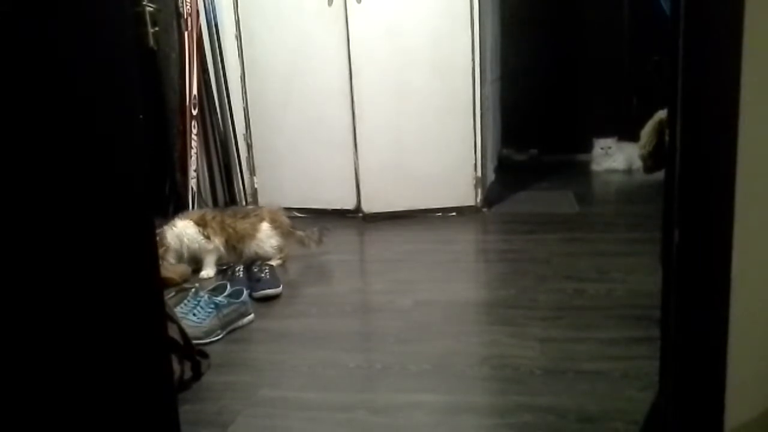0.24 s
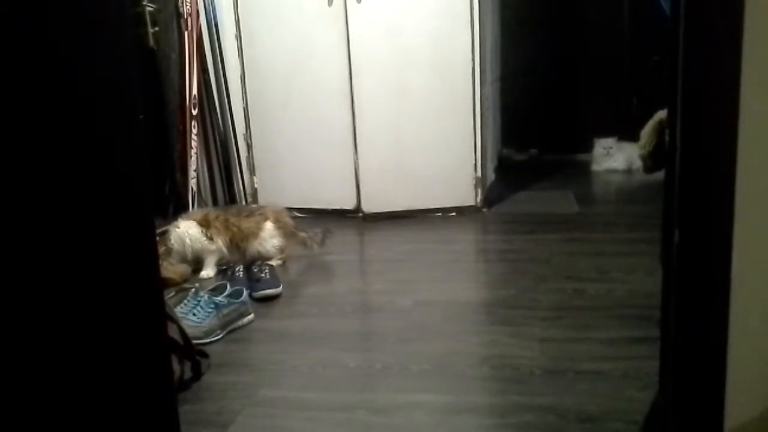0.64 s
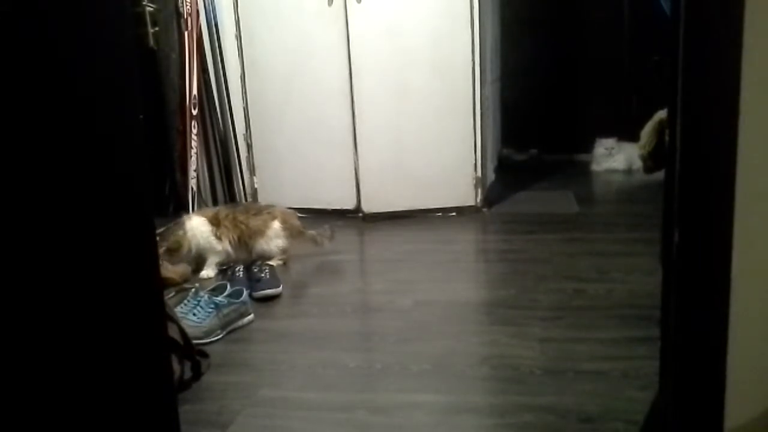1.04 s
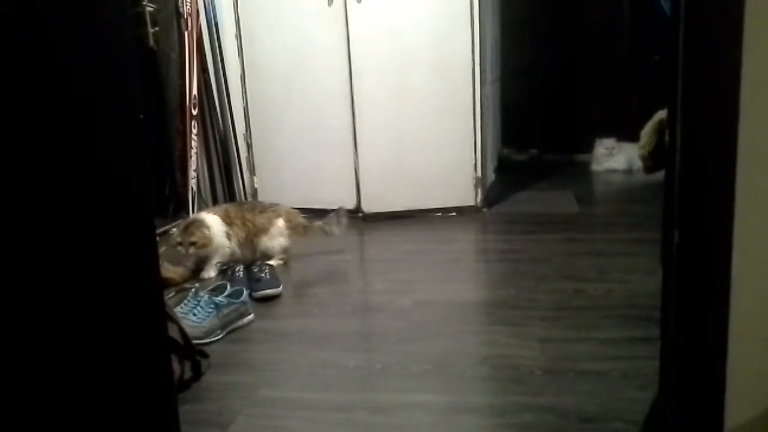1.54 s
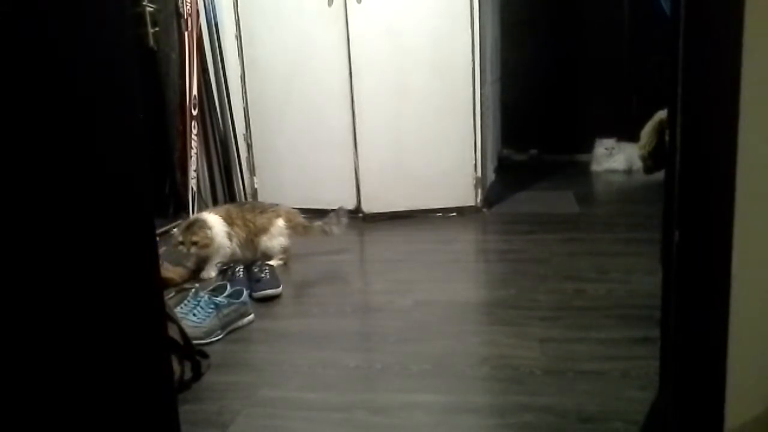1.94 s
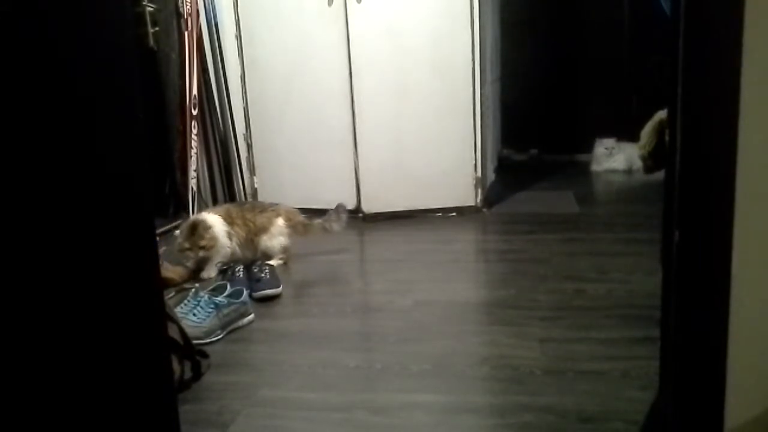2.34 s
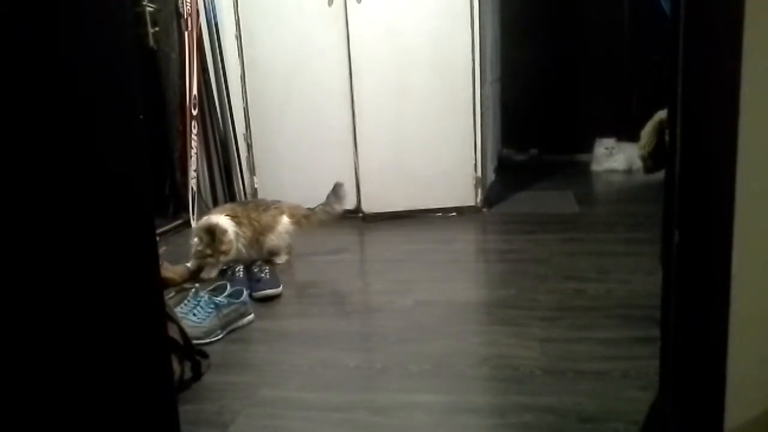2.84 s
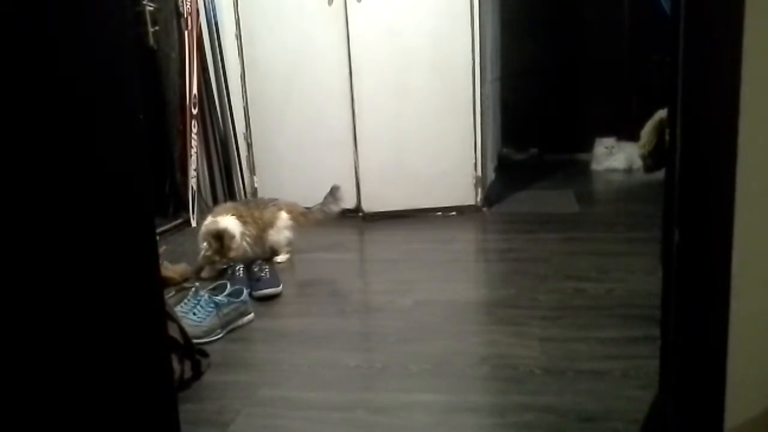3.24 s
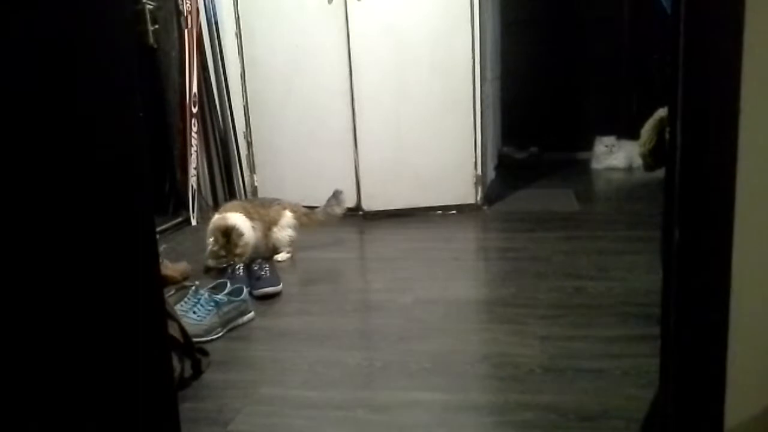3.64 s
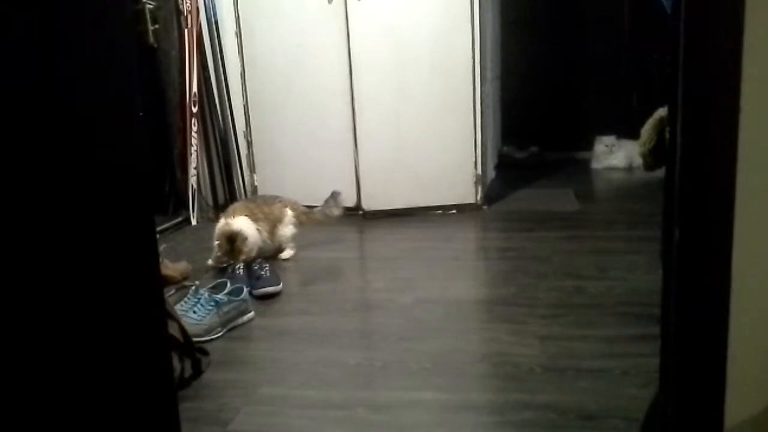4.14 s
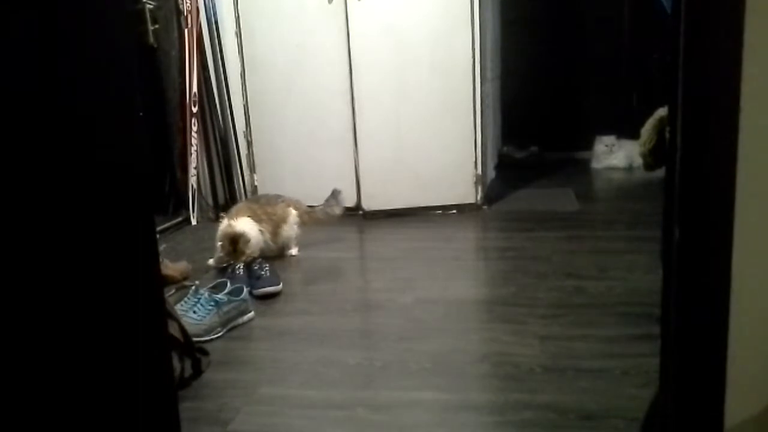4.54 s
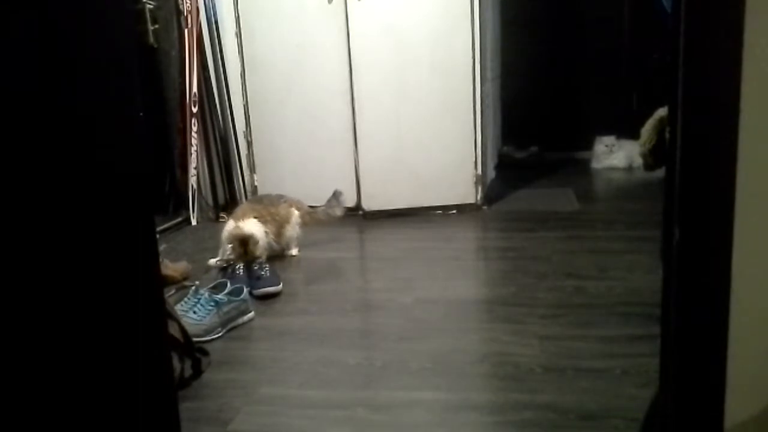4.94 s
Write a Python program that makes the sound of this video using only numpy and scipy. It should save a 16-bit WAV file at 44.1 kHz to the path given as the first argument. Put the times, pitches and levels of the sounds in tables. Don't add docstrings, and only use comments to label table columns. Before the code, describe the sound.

A hand-held coil tattoo machine clicks on and buzzes raspily without pause in a hallway, while something knocks over on the floor.

```python
import sys
import numpy as np
from scipy import signal
from scipy.fft import rfft, irfft
from scipy.io import wavfile
from scipy.ndimage import uniform_filter1d

SR = 44100
rng = np.random.default_rng(int(sys.argv[2]) if len(sys.argv) > 2 else 0)


def makeup_ratio(level_db):
    decades = np.asarray(level_db, float) / 20
    return 10 ** decades


def dump(signal):
    limited = np.clip(np.atleast_2d(signal).T, -1, 1)
    pcm = np.round(limited * 32767).astype(np.int16)
    wavfile.write(sys.argv[1], SR, pcm)


N = 228877

# time in seconds, strokes a second in Hz.
STROKE_PACE = [(.42, 77.8), (.62, 77.45), (1.11, 77.5), (1.22, 78.02), (1.9, 77.86), (2.55, 78.2),
               (2.98, 78.05), (3.26, 78.12), (3.8, 77.92), (4.03, 77.9), (4.13, 78.85), (4.28, 78.72),
               (4.56, 79.0), (5.19, 79.08)]
# middle in seconds, length in seconds, gain in pace in Hz.
FREE_SPELLS = [(2.115, .13, .5), (2.365, .18, .68), (3.11, .1, .27), (3.52, .47, .75), (3.64, .16, .22),
               (4.455, .14, .62), (4.65, .1, .55), (4.86, .14, .48), (5.06, .1, .56)]
# pitch in Hz, width in Hz, level in dB in a loose grip, in dB in a firm grip.
FRAME_MODES = [(228.7, 5.8, -12, -7.5), (379, 20, -19, -20), (463.4, 160, -8, -7.5), (807.8, 84, 3.5, 7.5),
               (849, 110, 4, 5.5), (1055, 98, -18.5, 0), (1443.6, 190, 9.5, 3), (1589, 190, 1, 4.5),
               (1866, 49, 0, -6), (2227, 79, 4.5, 7.5), (2497, 83, 7, 10.5), (2673.6, 58, 8.5, 9),
               (2920, 31, 2.5, -7), (3380, 117, -4, 10.5), (3805, 130, 8.5, 4.5), (4277, 90, 12.5, 5.5),
               (4790, 250, 2, 5.5), (5220, 117, 10, 10), (5470, 120, 6.5, 7.5), (5950, 200, 7.5, -6.5),
               (6540, 54, 0, -7.5), (7010, 35, -11, 7), (7520, 96, 4.5, 7), (7730, 670, 0.5, 3.5),
               (8194, 200, 2, -0.5), (9220, 420, 6.5, 10), (10700, 140, -1.5, 1), (12300, 640, 0.5, -10.5),
               (13600, 950, 3, -4)]
# frequency in Hz, level in dB per Hz.
LOOSE_PARTS = [(300, -62), (650, -22.5), (1200, -14.5), (2040, -9), (3000, -3), (6500, -3), (8500, -4),
               (10300, -3), (11800, -7), (14800, -4.5)]
# frequency in Hz, level in dB per Hz.
BLOW_EDGE = [(1500, -45), (2600, -13), (6000, -12), (12000, -15), (15000, -30)]
# frequency in Hz, level in dB.
SPRING_SIZZLE = [(200, -3), (550, -2), (800, -20.5), (1200, -18), (3000, -19), (8000, -6), (14800, -4)]
# time in seconds, steady buzz level in dB, grip from 0 to 1.
HAND_GRIP = [(.36, -24.5, 0.33), (.4, -24.5, 0.33), (.61, -22.5, 0.05), (1.12, -22.5, 0.05),
             (1.26, -22.5, 0.81), (1.43, -22.5, 0.63), (1.8, -23, 0.65), (2.12, -22.5, 0.76),
             (2.9, -22.5, 0.81), (3.6, -23, 1), (3.78, -22, 0.8), (3.84, -22.5, 0.59), (4.05, -23.5, 0.87),
             (4.2, -23, 0.86), (5.19, -23.5, 0.96)]
# start in seconds, gain in dB, fade in seconds.
SWINGS = [(0.614, 3.5, 0.071), (0.73, 4.5, 0.14), (.86, 2, 0.015), (0.979, 5, 0.052), (1.029, 1, 0.093),
          (1.152, 3.5, 0.073), (1.275, 4.5, 0.075), (1.595, 2, 0.032), (1.967, 2, 0.085),
          (2.065, 1.5, 0.024), (2.6, 3.5, 0.088), (3.301, 2, 0.075), (3.536, 4, 0.041), (3.835, 5.5, 0.17),
          (4.471, 0, 0.036), (4.688, 5.5, 0.13)]
# middle in seconds, length in seconds, pitch in Hz, width in Hz, gain in dB.
COLOUR_SPELLS = [(1.6, 1., 740, 170, -2), (3.75, .8, 890, 180, 4), (0.67, 0.4, 1010, 150, -11),
                 (4.2, 0.8, 1190, 150, -6), (2.7, 0.29, 720, 260, -3), (.48, .25, 810, 240, 4),
                 (4.75, 1.1, 1100, 230, 3.5), (1.75, .4, 1100, 300, -5), (1.7, 1.4, 1100, 230, -5),
                 (2.2, 0.91, 1100, 200, 3), (3.5, 0.27, 890, 100, -10), (3.98, 0.65, 1080, 280, -7),
                 (1.65, 1., 2500, 140, -4), (1.2, 0.83, 2680, 120, -1.5), (3.2, .5, 2680, 120, -2),
                 (3.8, 0.3, 2600, 110, 0.5), (3.95, .44, 4285, 150, -11), (3.95, .3, 2500, 140, -4),
                 (2.75, .5, 2520, 200, -3), (0.69, 0.8, 5200, 150, -0.5), (1.65, .5, 5230, 200, 0),
                 (3.9, 0.54, 6100, 820, -1.5), (3.92, 0.36, 1330, 250, 5.5), (2, 1.2, 490, 250, -1.5),
                 (3.8, 1.4, 410, 240, -4), (2.39, .13, 2690, 78, 3), (2.35, .2, 1950, 240, 3),
                 (.8, 0.68, 2680, 110, 2.5), (1.8, .4, 2500, 370, 1), (4.8, 0.72, 3000, 600, -4),
                 (2.4, 0.32, 12000, 5000, -3), (2.6, 0.37, 430, 300, -4), (.82, 0.74, 3400, 560, -2),
                 (.63, .06, 5230, 250, 3), (.757, .06, 5200, 200, 3), (3.9, .3, 2500, 65, -11),
                 (5, .5, 2300, 260, 1),
                 (1.5, 1., 1015, 70, -8.5), (2.1, 2., 1180, 80, 4), (1.8, 1.2, 1745, 90, 6),
               (0.91, .8, 1860, 100, -5), (0.63, .8, 1745, 80, -2), (2.3, .6, 860, 70, -4),
               (1.5, .55, 860, 78, -2), (2.3, 1.3, 935, 70, 5), (2.1, 1., 2520, 120, -1.5),
               (1.6, 0.99, 2670, 120, -3), (4.4, .3, 2670, 120, -1), (2.3, 2.2, 2970, 140, 2),
               (1.6, .8, 2000, 110, 2), (2.1, 1.8, 630, 70, -5.5), (2.5, 1.7, 310, 90, -6.5),
               (2.4, .5, 235, 90, -9), (2.87, .3, 235, 90, -9), (2.7, .7, 330, 70, -7),
               (2.3, .55, 340, 70, -5), (1.2, .6, 310, 90, 5), (3.3, .6, 3150, 160, -6),
               (4.6, .6, 2100, 120, 4), (4.8, .6, 2520, 130, -1.5), (4.2, .7, 940, 70, -1.5),
               (3.4, .55, 1100, 79, -6), (3.55, .3, 1500, 80, -7.5), (4.15, .3, 940, 70, 6),
               (0.83, 0.7, 3300, 110, -5), (4.3, .14, 1100, 90, -7), (4.7, .9, 1600, 70, -2.5),
               (4.7, 0.57, 1960, 100, 4.5), (1.3, .15, 3200, 110, -6), (2.9, .12, 450, 200, -7),
               (1.15, .3, 235, 90, 3.5), (1.3, 0.56, 555, 70, 4), (5.1, .25, 200, 150, -12),
               (1.65, .8, 700, 60, -4), (4.85, .3, 235, 90, 5), (3.95, .3, 6000, 1800, -2),
               (4.15, .3, 235, 90, -6),
                 (.78, .85, 2558, 70, 7), (.9, .6, 2480, 70, -5), (.65, .56, 2635, 70, -5),
                  (1.63, .84, 2652, 70, -4), (3.7, .56, 2740, 110, -4), (.8, .35, 2870, 80, -7),
                  (1.35, .28, 3276, 70, -7), (1.65, .85, 3354, 70, 4), (2.88, .56, 3510, 70, -4),
                  (4., .56, 3510, 70, -3), (.78, .85, 3798, 70, -4), (.8, .3, 3680, 130, 4),
                  (2.9, .6, 3822, 70, 3), (4., .56, 3830, 70, 3), (.93, .56, 4070, 140, 6),
                  (.78, .85, 4262, 70, -3), (2.2, 1.95, 4372, 70, 7), (1.5, .56, 4212, 70, -4),
                  (3.02, .28, 4290, 70, -4), (4.85, .6, 4345, 70, 5), (.93, .56, 4495, 70, 5),
                  (2.3, 2.8, 4760, 70, -6), (2.4, 2.2, 4838, 70, 4), (1.5, .56, 4992, 70, -5),
                  (1.2, 1.7, 5130, 70, 5), (.78, .85, 5192, 70, -5), (4.7, .9, 5295, 70, 4),
                  (.65, .56, 5270, 70, 4), (2.7, .85, 5465, 70, -4), (4., .56, 5470, 110, -4),
                  (.78, .85, 5425, 70, -3), (.7, .7, 5812, 70, 5), (1.63, .84, 5928, 70, 5),
                  (1.76, .56, 6010, 90, -7), (.78, .85, 6122, 70, 4), (1.65, .9, 2030, 60, -6),
                  (2.9, .9, 2035, 60, -5), (3.55, .5, 1960, 80, 5), (1.6, .7, 1090, 60, 5),
                  (.75, .9, 935, 60, -5)]
# frequency in Hz, depth in dB.
PATCH_DEPTH = [(600, 1), (1500, 1.2), (2200, 2.2), (14800, 2.2)]
# start in seconds, peak in dB, pitch in Hz, rise in seconds.
FLOOR_BUMPS = [(.802, -9.5, 403, 0.0035), (.807, -9.5, 755, 0.0029), (.811, -14, 828, 0.003),
               (.81, -14.5, 333, 0.0057), (.82, -16, 323, 0.0065), (.842, -17, 740, 0.0034),
               (.829, -10, 700, 0.0046), (.832, -12.5, 342, 0.0057), (.839, -18, 410, 0.003),
               (.807, -17.5, 604, .003), (.808, -17, 960, .002), (.9, -25, 880, .004),
               (.89, -27, 1000, .003), (.824, -24, 1300, .003), (.34, -42, 6050, .003),
               (.343, -49, 9200, .003), (.846, -12, 471, 0.0028), (.848, -12.5, 750, 0.0025),
               (.858, -35, 347, 0.0038), (.867, -19.5, 700, 0.003), (.868, -26, 355, 0.0033),
               (.879, -22, 726, 0.005), (.885, -22, 358, 0.0062), (.9, -28, 750, 0.0022),
               (.935, -32, 341, 0.009), (3.575, -31.5, 396, 0.0072), (3.58, -29, 610, 0.0063)]
# start in seconds, peak in dB, colour in Hz.
NAIL_TICKS = [
    (0.022, -47, 4000),
    (0.086, -48, 3300),
    (0.286, -47, 4700),
    (0.2905, -38, 3220),
    (0.809, -17.5, 1560),
    (0.876, -12, 1506),
    (0.883, -12.5, 4100),
]
# time in seconds, rustle level in dB.
FINGER_RUSTLE = [
    (0.0, -59.5),
    (0.286, -77),
    (0.294, -51),
    (0.314, -54.5),
    (0.342, -57.5),
    (0.349, -52),
]
# frequency in Hz, level in dB per Hz.
SKIN_COLOUR = [(880, -28), (1500, -8), (1740, 4.5), (2320, 2.5), (2820, 1), (4350, 4), (4800, -3),
               (5500, 2), (6500, -12.5), (9750, -29), (16500, -120)]
# frequency in Hz, time to fall 60 dB in seconds.
HALL_DECAY = [(300, 0.32), (1000, 0.45), (4000, 0.24), (12000, 0.051)]
# frequency in Hz, level in dB per Hz.
ROOM_TONE = [(15, -55), (25, -24), (171, -11), (236, -5.5), (460, -12.5), (569, -12.5), (1080, -21),
             (1170, -10.5), (1500, -24.5), (2500, -35), (14800, -36.5)]

ON_S, PICKUP_S, START_DB = 0.3487, 0.033, -33.5
SURGE_RISE_S, EASE_S = 0.032, 0.05
BRIGHT_DB, GRIP_DULLS_DB, SURGE_DULLS_DB_PER_DB = 3, 2, 0.37
LATE_DULL_S, LATE_DULL_DB = 3.8, 1.5
TIGHT_US, LOOSE_US_PER_HZ, SLIP_US, TIGHT_PACE_HZ = 4.5, 8, 2, 77.5
CRACK_S = 0.006
BUMP_CUT_HZ, BUMP_DB, BUMP_HALL_DB = 235, 0.5, -6
HALL_DB, TONE_DB = -7, -51


def evened(x):
    return x / np.sqrt(np.mean(x ** 2) + 1e-20)


def smoothed(x, s):
    return uniform_filter1d(x, size=round(s * SR))


def read(points, hz):
    f, value = np.transpose(points)
    return np.interp(np.log(hz + 1), np.log(f + 1), value)


def coloured(x, points):
    gain = makeup_ratio(read(points, np.fft.rfftfreq(len(x), 1 / SR)))
    return irfft(rfft(x) * gain, len(x))


def curves(rows):
    s, *columns = np.transpose(rows)
    return [np.interp(np.arange(N) / SR, s, c) for c in columns]


def through(x, response):
    return signal.oaconvolve(x, response)[:N]


def machine():
    t, hz, surge_db = np.arange(N) / SR, pace(), surges()
    steady_db, grip = curves(HAND_GRIP)
    grip = np.clip(grip, 0, 1)
    not_yet_swinging = np.clip(1 - (t - ON_S) / PICKUP_S, 0, 1)
    level_db = steady_db + surge_db + (START_DB - steady_db) * not_yet_swinging
    bright_db = BRIGHT_DB - GRIP_DULLS_DB * grip - SURGE_DULLS_DB_PER_DB * surge_db
    bright_db -= LATE_DULL_DB * smoothed(1. * (t > LATE_DULL_S), 0.13)

    pace_change = smoothed(abs(np.gradient(hz) * SR), 0.091)
    loose_us = TIGHT_US + LOOSE_US_PER_HZ * (hz - TIGHT_PACE_HZ) + SLIP_US * pace_change
    wander_hz = 0.06 * evened(uniform_filter1d(rng.standard_normal(N), size=1500))
    turns = np.cumsum(hz + wander_hz) / SR
    pulsing = 1 + 0.083 * np.cos(2 * np.pi * turns)
    sizzle = coloured(rng.standard_normal(N) * pulsing, SPRING_SIZZLE)
    drive = evened(strikes(turns, abs(loose_us))) + sizzle

    late_s = 0.004 + 0.014 * abs(evened(uniform_filter1d(rng.standard_normal(4097), size=20)))
    loose, firm = (frame(db, late_s) for db in np.transpose(FRAME_MODES)[2:])
    buzz = evened(through(drive * (1 - grip), loose) + through(drive * grip, firm))
    treble = signal.sosfiltfilt(signal.butter(2, 6500, "high", fs=SR, output="sos"), buzz)
    buzz += treble * (makeup_ratio(bright_db) - 1)
    return buzz * makeup_ratio(level_db) * (t > ON_S)


def pace():
    t = np.arange(N) / SR
    free_hz = sum(hz * (abs(t - s) < length / 2) for s, length, hz in FREE_SPELLS)
    return curves(STROKE_PACE)[0] + smoothed(free_hz, EASE_S)


def surges():
    t, total_db = np.arange(N) / SR, np.zeros(N)
    for s, db, fade in SWINGS:
        rise = np.clip((t - s) / SURGE_RISE_S, 0, 1)
        total_db += db * rise * np.exp(-np.maximum(t - s - SURGE_RISE_S, 0) / fade)
    return total_db


def strikes(turns, loose_us):
    at = np.interp(np.arange(1, int(turns[-1])), turns, np.arange(N))
    chance = rng.standard_normal((len(at), 2))
    at = at + chance[:, 0] * loose_us[at.astype(int)] * SR / 1e6
    taps = at.astype(int)[:, None] + np.arange(-16, 17)
    shape = np.sinc(taps - at[:, None]) * np.hanning(35)[1:-1]
    out = np.zeros(N + 64)
    out[taps] = shape * makeup_ratio(0.8 * chance[:, 1:])
    return out[:N]


def frame(mode_db, late_s):
    hz = np.fft.rfftfreq(8192, 1 / SR)
    power = makeup_ratio(2 * read(LOOSE_PARTS, hz))
    for (f, width, *_), db in zip(FRAME_MODES, mode_db):
        power += makeup_ratio(2 * db) / (1 + (2 * (hz - f) / width) ** 2) ** 2
    ringing = np.sqrt(power) * np.exp(-2j * np.pi * np.cumsum(late_s) * hz[1])
    crack = -makeup_ratio(read(BLOW_EDGE, hz)) * np.exp(-2j * np.pi * hz * CRACK_S)
    return irfft(ringing + crack)


def turning(x):
    hz, t, z = signal.stft(x, SR, nperseg=1024, noverlap=768)
    field = uniform_filter1d(rng.standard_normal(z.shape[::-1]), size=16, axis=0)
    field = uniform_filter1d(field, size=2, axis=1)
    gain_db = read(PATCH_DEPTH, hz)[:, None] * np.minimum(evened(field.T) + 0.2, 0.7)
    for s, length, f, width, db in COLOUR_SPELLS:
        region = np.exp(-(2 * (hz - f) / width) ** 4)
        spell = np.exp(-(2 * (t - s) / length) ** 4)
        gain_db += db * np.outer(region, spell)
    return signal.istft(z * makeup_ratio(gain_db), nperseg=1024, noverlap=768)[1][:N]


def knocks():
    t, out = np.arange(4000) / SR, np.zeros(N)
    for s, db, hz, rise in FLOOR_BUMPS:
        ring = np.sin(2 * np.pi * hz * t) + 0.13 * np.sin(2 * np.pi * 1.42 * hz * t)
        swell = (t / rise * np.exp(1 - t / rise)) ** 2
        out[round(s * SR):][:len(t)] += makeup_ratio(db) * ring * swell
    return signal.sosfilt(signal.butter(4, BUMP_CUT_HZ, "high", fs=SR, output="sos"), out)


def ticks():
    t, out = np.arange(600) / SR, np.zeros(N)
    for (s, db, hz), noise in zip(NAIL_TICKS, rng.standard_normal((len(NAIL_TICKS), 600))):
        colour = [(hz / 4, -30), (hz / 2, 0), (hz * 1.3, 0), (hz * 2, -30)]
        crack = coloured(noise * np.exp(-t / 0.0033), colour)
        out[round(s * SR):][:600] += makeup_ratio(db) * crack / abs(crack).max()
    return out


def rustle():
    grains = rng.standard_normal(N) * makeup_ratio(3.4 * np.minimum(rng.exponential(1, N), 4))
    before_current = np.arange(N) < FINGER_RUSTLE[-1][0] * SR
    return evened(coloured(grains, SKIN_COLOUR)) * makeup_ratio(curves(FINGER_RUSTLE)[0]) * before_current


def hall(x):
    hz, t, z = signal.stft(rng.standard_normal((3, SR // 2)), SR, nperseg=256)
    tails = signal.istft(z * makeup_ratio(-60 * t / read(HALL_DECAY, hz)[:, None]), SR, nperseg=256)[1]
    tails = np.pad(tails, ((0, 0), (300, 0))) / np.linalg.norm(tails)
    turn = np.pi * 0.3 * np.arange(N) / SR
    step = np.pi * np.arange(len(tails)) / len(tails)
    return sum(through(x * np.cos(turn + a), tail) for a, tail in zip(step, tails))


def room_tone():
    return makeup_ratio(TONE_DB) * evened(coloured(rng.standard_normal(N), ROOM_TONE))


def scene():
    near, bumps = machine() + ticks() + rustle(), knocks()
    heard = near + makeup_ratio(HALL_DB) * hall(near + makeup_ratio(BUMP_HALL_DB) * bumps)
    heard = np.where(np.arange(N) / SR > ON_S, turning(heard), heard)
    return np.tile(heard + makeup_ratio(BUMP_DB) * bumps + room_tone(), (2, 1))


def roll_off(x):
    return signal.sosfilt(signal.butter(12, 15400, fs=SR, output="sos"), x)


def record(dry):
    return roll_off(dry)


dry = scene()
out = record(dry)
dump(out)
```